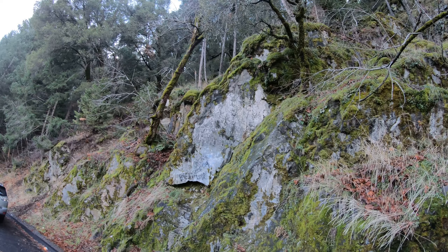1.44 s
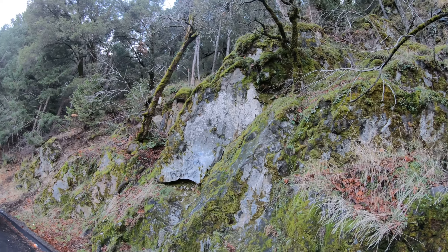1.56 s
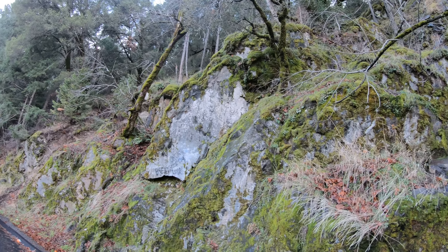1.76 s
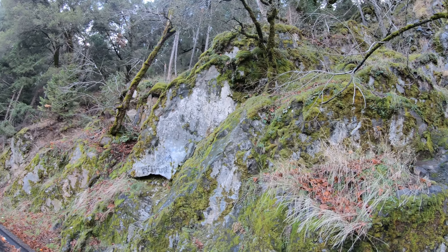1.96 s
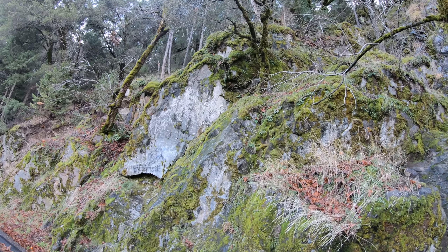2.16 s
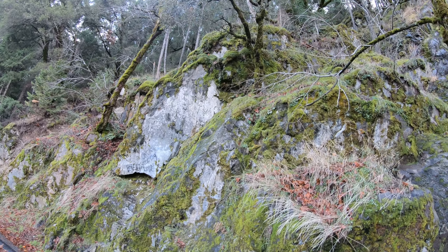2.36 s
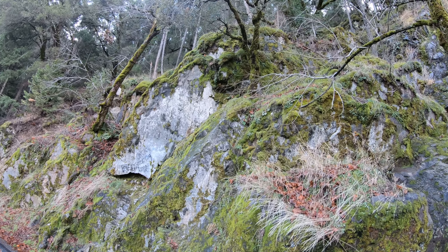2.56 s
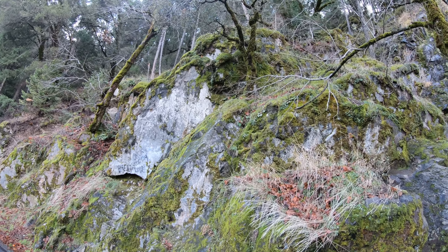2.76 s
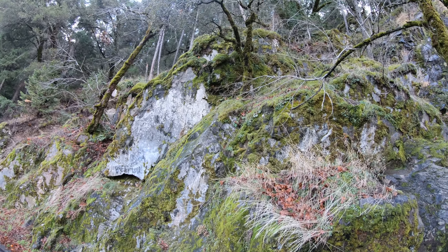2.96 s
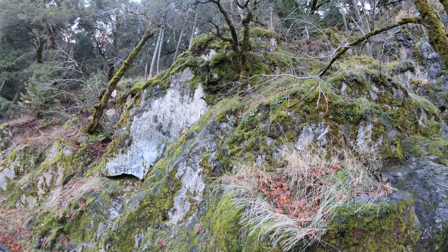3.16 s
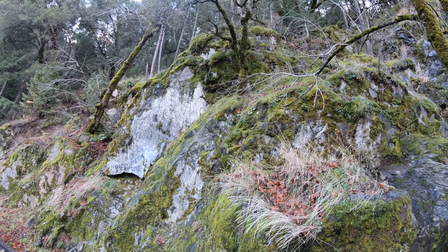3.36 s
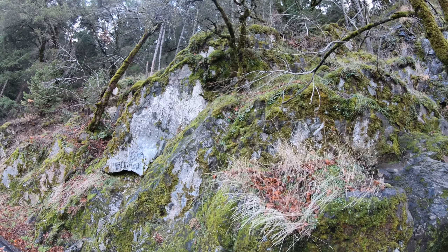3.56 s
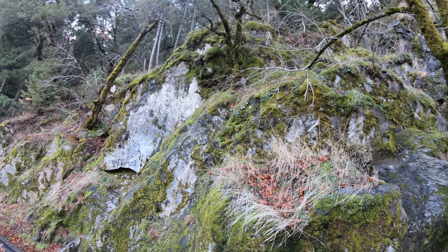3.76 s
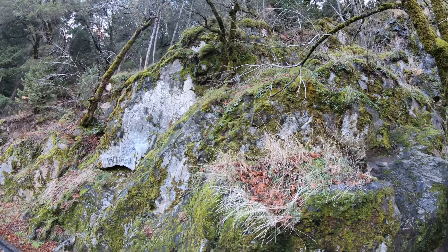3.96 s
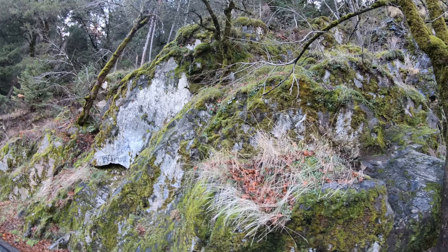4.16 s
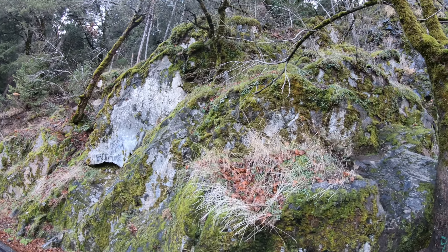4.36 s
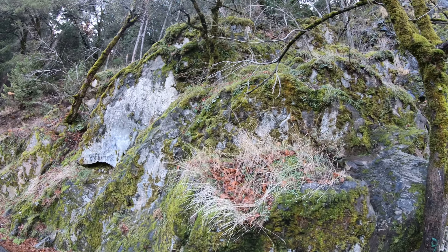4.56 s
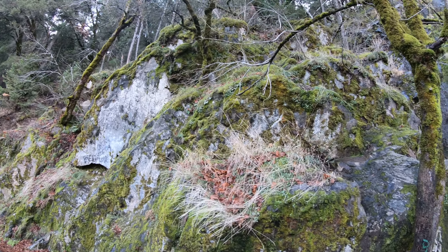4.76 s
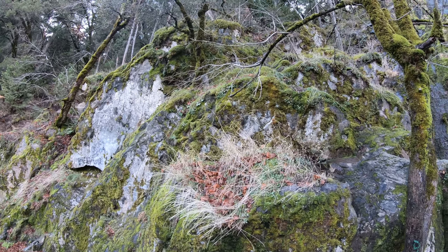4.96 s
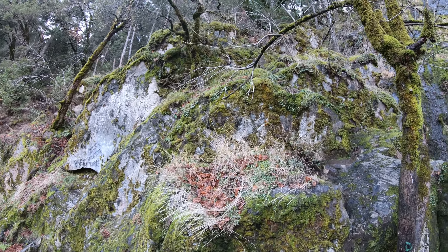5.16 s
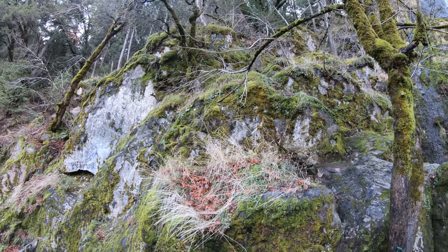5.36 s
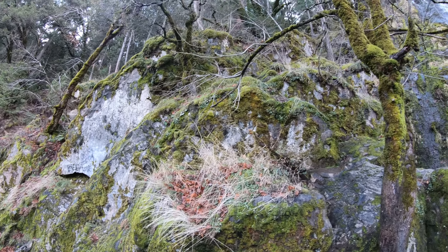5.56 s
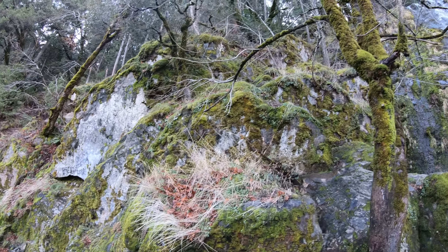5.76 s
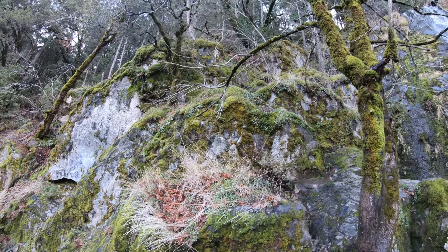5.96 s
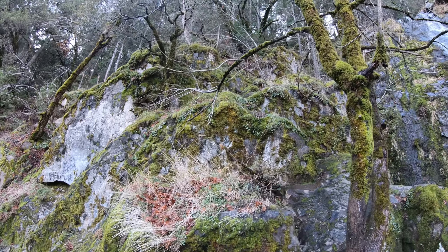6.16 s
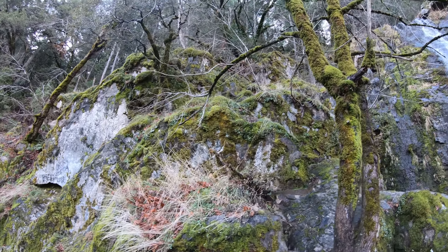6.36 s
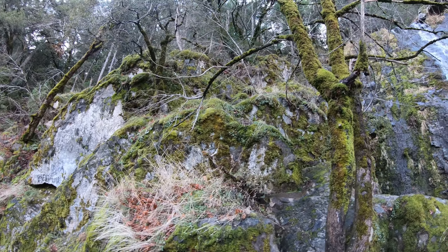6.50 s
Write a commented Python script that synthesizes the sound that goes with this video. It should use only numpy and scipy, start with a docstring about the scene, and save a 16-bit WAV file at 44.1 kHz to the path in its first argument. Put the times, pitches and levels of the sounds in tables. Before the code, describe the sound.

A waterfall rushes steadily in a forest over gusting deep rumble, while an unseen engine drones and swells twice and the sound widens late.

```python
"""In a forest, a waterfall rushes steadily down a rock face, over a gusting low rumble and a hollow band.
Water and air are shaped noise; the water's five registers follow slow level curves and moving resonances.
A four-cylinder engine drones out of sight and swells in two steps, with two fainter gliding hums beside it;
all of these are sums of sine lines that waver a little.
The microphone opens from a narrow, nearly mono beam to wide stereo, which lets in more of the spray."""
import sys
import numpy as np
from scipy import signal
from scipy.fft import irfft, next_fast_len
from scipy.io import wavfile

SR = 44100
rng = np.random.default_rng(int(sys.argv[2]) if len(sys.argv) > 2 else 0)


def wav_out(sig):
    """Save sig, one row per channel (or a flat mono array), as 16-bit PCM at SR to the path in sys.argv[1]."""
    wavfile.write(sys.argv[1], SR, np.round(np.clip(np.atleast_2d(sig).T, -1, 1) * 32767).astype(np.int16))


N = 300321

# opening of the microphone: (time [s], wide share [0-1])
OPENING = [(0, 0), (5.25, 0), (5.45, 0.07), (5.64, 0.45), (6.2, 0.94), (6.81, 0.97)]
# the engine's speed: (time [s], working cycles [per s])
SPEED = [(0, 24.0), (1.0, 23.83), (2.9, 24.21), (3.45, 24.14), (4.1, 23.5), (4.72, 23.26), (5.5, 23.15),
         (6.81, 23.3)]
# the engine's load as the level of its drone, used as a swing around its mean: (time [s], level [dB])
LOAD = [(0, -50), (0.65, -35.5), (1.5, -41), (1.85, -38), (2.08, -29), (2.4, -24.5), (3.0, -26),
        (3.88, -30.5), (4.0, -19.3), (4.45, -21), (4.72, -17.5), (5.1, -21.2), (5.45, -20.5), (5.65, -18.7),
        (6.81, -16.7)]


def from_db(db):
    """Decibels to gain."""
    return 10 ** (np.asarray(db) / 20)


def rms(x):
    """Root mean square."""
    return np.sqrt(np.mean(x ** 2) + 1e-20)


def seconds():
    """Time of every sample."""
    return np.arange(N) / SR


def in_time(rows):
    """Each column of a curve table, sample by sample."""
    s, *columns = np.transpose(rows)
    return [np.interp(seconds(), s, column) for column in columns]


def swing(curve):
    """A level curve in dB around its own mean."""
    db, = in_time(curve)
    return db - db.mean()


def ramp(start_s, length_s):
    """Rises evenly from 0 to 1."""
    return np.clip((seconds() - start_s) / length_s, 0, 1)


def bell(offset, width):
    """A smooth hump of height 1 and the given width at half height."""
    return .5 ** ((2 * offset / width) ** 2)


def bin_hz():
    """Frequency of every spectral bin of a noise a little longer than the scene."""
    return np.maximum(np.fft.rfftfreq(2 * next_fast_len(N // 2 + 1), 1 / SR), 1)


def in_frequency(rows):
    """Each column of a spectrum table, bin by bin, along a log frequency axis."""
    hz, *columns = np.transpose(rows)
    return [np.interp(np.log(bin_hz()), np.log(hz), column) for column in columns]


def white():
    """Spectrum of a fresh white noise."""
    real, imaginary = rng.standard_normal((2, len(bin_hz())))
    return real + 1j * imaginary


def waveform(spectrum):
    """From spectrum to samples."""
    return irfft(spectrum)[..., :N]


def below(hz, order=12):
    """Gain of a smooth low-pass that halves the amplitude at the given frequency."""
    return 1 / (1 + (bin_hz() / hz) ** order)


def drift(rate_hz):
    """Slow random wander with spread 1."""
    slow = waveform(white() * below(rate_hz, order=2))
    return slow / rms(slow)


def noise(colour):
    """Mono low noise of a given colour that dies away above its last point; rms 1."""
    db, = in_frequency(colour)
    x = waveform(white() * from_db(db) * below(colour[-1][0], order=4))
    return x / rms(x)


def through_ports(colour, ports):
    """Stereo spectrum of countless splashes: a part that both ports share, and a diffuse part."""
    db, = in_frequency(colour)
    likeness, balance_db, lead = in_frequency(ports)
    likeness = np.clip(likeness, 0, 1)
    sides = np.array([[1], [-1]])  # left, right
    shared = np.sqrt(1 + likeness) * white()
    diffuse = np.sqrt(1 - likeness) * white() * sides
    balance = from_db(db + sides * balance_db / 2)
    return (shared + diffuse) * balance * np.exp(-.5j * sides * lead)


def swept_peak(x, rows, width_hz, block=256):
    """A broad resonance that moves block by block and lifts or hollows its band."""
    hz, db = in_time(rows)
    r = np.exp(-np.pi * width_hz / SR)  # pole radius
    band, state = np.zeros_like(x), np.zeros((2, 2))
    for i in range(0, N, block):
        poles = [1, -2 * r * np.cos(2 * np.pi * hz[i] / SR), r * r]
        band[:, i:i + block], state = signal.lfilter([1, 0, -1], poles, x[:, i:i + block], zi=state)
    band = band * (1 - r * r) / 2  # about unit gain at the centre
    return x + (from_db(db) - 1) * band


def reshape_roar(water):
    """Four broad resonances wander through the roar and change its tone colour."""
    # each peak: (time [s], centre [Hz], lift [dB])
    bottom_path = [(0, 250, .5), (.8, 250, -1.5), (2.1, 240, 0), (2.33, 230, -8.5), (2.8, 230, -3),
                   (3.5, 260, 1), (5, 220, 2), (5.8, 220, 2.5), (6.81, 230, -1)]  # the bottom of the roar dips briefly
    body_path = [(0, 530, 2.5), (.6, 470, -2), (1.3, 450, -2), (1.7, 640, 1), (2.4, 650, 2),
                 (3.55, 620, 1.5), (4.3, 420, 1), (5.2, 490, 0), (5.9, 600, -1.5), (6.81, 560, -2.5)]  # the body fills out and thins again
    swell_path = [(0, 1000, -2.5), (.45, 1000, -2.5), (.85, 1000, -5), (1.5, 1080, -3.5), (1.9, 1300, -.5),
                  (2.35, 1490, 3), (2.9, 1550, -1.5), (3.3, 1400, -2.3), (3.9, 1100, -2), (4.4, 1120, 1),
                  (5.25, 1240, 3.7), (5.9, 950, 1.8), (6.81, 830, 4)]  # a broad swell wanders
    edge_path = [(0, 5800, 2.5), (1.5, 5750, 1.5), (3, 5700, -.5), (4.8, 5700, -2), (5.6, 5700, -2.5),
                 (6.3, 5700, -.5)]  # the upper edge of the hiss dulls
    water = swept_peak(water, bottom_path, width_hz=110)
    water = swept_peak(water, body_path, width_hz=170)
    water = swept_peak(water, swell_path, width_hz=360)
    return swept_peak(water, edge_path, width_hz=700)


def waterfall(low_hz=225, flutter_db=0.46, flutter_rate_hz=20, early_fade_s=2.25):
    """Far water merges to a smooth roar in five registers, each of which flutters a little."""
    # edges between the registers [Hz]
    edges_hz = [950, 2200, 5600, 10600]
    # plunge, rush, hiss, spray, mist: (base level [dB], share of the flow's swing, share of the hiss's swing,
    # early lift [dB], gain once wide [dB])
    register_rows = [(-34.6, 0.94, 0.13, 1, -1.0), (-38, 0.37, 0.39, 0.5, -2.6),
                     (-43.4, 0.1, 0.9, -0.5, -1.7), (-56.1, 0, 0.57, 5.6, 7.5), (-68.2, 0, .45, 1.7, 3.5)]
    # strength of the falling water, used around its mean: (time [s], level [dB])
    flow_curve = [(0, -26.5), (0.9, -32.0), (1.7, -30), (2.35, -27.5), (2.9, -29.5), (3.85, -28),
                  (4.8, -27.9), (5.25, -27.5), (5.8, -29.5), (6.81, -28.3)]
    # strength of the hiss, used around its mean: (time [s], level [dB])
    hiss_curve = [(0, -39.5), (1.1, -39.6), (1.7, -39.5), (3.0, -41), (3.95, -39.5), (4.6, -42),
                  (5.25, -41.3), (5.8, -42.5), (6.81, -39.5)]
    # the water through each microphone pattern: (frequency [Hz], relative density [dB per Hz])
    beam_colour = [(210, 3), (320, -10.8), (480, -10.3), (690, -8.5), (880, -9.3), (1050, -11.6),
                   (1350, -12.8), (1850, -15.9), (2350, -21.5), (3250, -22), (3900, -25.2), (5200, -26.2),
                   (6000, -37.5), (10300, -46), (11350, -55.5), (12500, -47.5), (15200, -64)]
    wide_colour = [(210, -4), (350, -10.5), (580, -13.3), (890, -9.6), (1080, -12), (1400, -11.3),
                   (1950, -15), (2500, -21), (3700, -25), (6500, -27), (8600, -26), (9700, -35.5),
                   (11000, -42), (12800, -46.5), (15200, -60)]
    # the two ports in each pattern: (frequency [Hz], left-right likeness [0-1], left over right [dB],
    # lead of the right port [radians])
    beam_ports = [(2000, 1, 0, 0), (5000, .997, 0, 0), (10900, .999, 0, 0), (11500, .35, 0, -.2),
                  (12300, .4, -3, -1.4), (13500, .35, -6, -1.2), (15000, .3, -2, -.9)]
    wide_ports = [(210, 0.998, 0, 0.0), (480, 0.97, 0, 0.0), (880, 0.75, 0, -0.2), (1400, 0.48, 2, -0.2),
                  (2600, 0.18, -2, 0.0), (3700, 0.45, -4, -0.3), (5200, 0.55, 0, 1.5),
                  (6400, 0.59, -2, 2.6), (8500, 0.43, -6, 2.4), (9700, 0.1, -1, 4.2),
                  (12800, 0.27, -3, 6.1), (15000, 0.18, -1, 5.7)]

    wide = np.clip(in_time(OPENING)[0], 0, 1)
    flow_db, hiss_db = swing(flow_curve), swing(hiss_curve)
    # the two patterns cross over at equal power
    patterns = [(through_ports(beam_colour, beam_ports), np.sqrt(1 - wide)),
                (through_ports(wide_colour, wide_ports), np.sqrt(wide))]
    low_passes = [below(low_hz, order=8)] + [below(hz) for hz in edges_hz] + [below(SR)]
    registers = np.diff(low_passes, axis=0)
    above_rumble = bin_hz() > 260  # each register is levelled on its mono sum above this
    early = np.exp(-seconds() / early_fade_s)
    roar = 0
    for register, (base_db, with_flow, with_hiss, early_db, wide_db) in zip(registers, register_rows):
        water = 0
        for pair, share in patterns:
            mono = waveform(pair.mean(axis=0) * register * above_rumble)
            water = water + share * waveform(pair * register) / rms(mono)
        db = base_db + with_flow * flow_db + with_hiss * hiss_db + early_db * early + wide_db * wide
        roar = roar + water * from_db(db + flutter_db * drift(flutter_rate_hz))
    return reshape_roar(roar)


def surging(bed_db, surges):
    """Gain of a bed with rounded surges on top, added in power."""
    power = from_db(bed_db) ** 2
    for crest_s, length_s, db in surges:
        power = power + from_db(db) ** 2 * bell(seconds() - crest_s, length_s)
    return np.sqrt(power)


def rumble(own_air_db=-6, air_db=-36.7, air_follows=0.44, pool_db=-41.3):
    """Gusts of deep air with the boom of the plunge pool; once wide, each port also feels air of its own."""
    # colours of the air and the pool: (frequency [Hz], relative density [dB per Hz])
    air_colour = [(10, -17), (20, -14), (30, -4.5), (42, -3), (60, -1), (85, -3), (130, -13), (250, -16)]
    pool_colour = [(40, -21), (60, -12), (85, -15), (105, 3), (135, 9), (165, 0.5), (205, -7), (280, -22),
                   (400, -48)]
    # gusts and booms: (time of the crest [s], length at half power [s], level [dB])
    gust_rows = [(.6, .2, -34), (1.018, .22, -31.5), (1.55, 0.22, -38), (2.328, 0.2, -32), (3.3, 0.6, -38),
                 (4.42, 0.14, -26.5), (5.974, 0.18, -30.5)]
    boom_rows = [(0.83, 0.2, -31), (2.85, .35, -36), (3.4, .4, -37), (4.47, 0.18, -28.5),
                 (5.85, 0.35, -35.5)]

    own_gain = in_time(OPENING)[0] * from_db(own_air_db)
    own_air = own_gain * np.array([noise(air_colour), noise(air_colour)])
    # between gusts the air follows a share of the engine load's swing
    air_gain = surging(air_db + air_follows * swing(LOAD), gust_rows)
    air = air_gain * (noise(air_colour) + own_air)
    pool = surging(pool_db, boom_rows) * noise(pool_colour)
    return air + pool


def tone(hz, db, waver_db, wander):
    """A line whose level (dB) and phase (radians) waver slowly on the way through the open air."""
    phase = 2 * np.pi * (np.cumsum(hz) / SR + rng.random()) + wander * drift(2)
    level = from_db(db + waver_db * drift(1.6))
    return np.sqrt(2) * level * np.sin(phase)  # the root makes the level an rms


def hollow(level_db=-34.5, hold_s=1.9, release_s=0.4, drop_db=12):
    """A hollow low band of the roar, with two engine lines ringing in it, that holds and then sinks."""
    # the band's colour: (frequency [Hz], relative density [dB per Hz])
    band_colour = [(95, -24), (120, -3.5), (148, 1), (170, 0.5), (195, 2), (220, 0), (242, -14), (262, -7),
                   (290, -37)]
    # the ringing lines against the band: (multiple of the cycle rate, level [dB])
    ringing_orders = [(9, -7), (11, -13)]

    cycle_hz, = in_time(SPEED)
    lines = sum(tone(k * cycle_hz, db, waver_db=1.0, wander=0.19) for k, db in ringing_orders)
    gain = from_db(level_db - drop_db * ramp(hold_s, release_s))
    return gain * (noise(band_colour) + lines)


def pulls(attack_s=0.22, release_s=0.18, sag_db_per_s=3):
    """Lift in dB as the engine pulls hard: overtones come up quickly, sag and let go."""
    # each pull: (start [s], length before release [s], lift before the sag [dB])
    pull_rows = [(2.56, 1.02, 13), (4.47, 2.25, 14)]
    lift_db = 0
    for start_s, length_s, db in pull_rows:
        sagging_db = db - sag_db_per_s * (seconds() - start_s)
        hold = ramp(start_s, attack_s) * (1 - ramp(start_s + length_s, release_s))
        lift_db = lift_db + sagging_db * hold
    return lift_db


def engine(firing_db=-31.1, waver_db=.6, wander=0.04):
    """Four firings a cycle give the drone; unequal cylinders add lines between, which make it throb."""
    # lines that follow the firing tone: (multiple of the cycle rate, level [dB])
    firing_orders = [(4, 0), (5, -10.5), (12, -23)]
    # lines from unequal cylinders: (multiple of the cycle rate, level [dB])
    uneven_orders = [(3, -10), (6, -8.5), (7, 2), (9, -12), (10, -18), (11, -22), (13, -35), (15, -18)]

    cycle_hz, = in_time(SPEED)
    load_db, pull_db = swing(LOAD), pulls()
    # octave and throb follow only a share of the load's swing, and rise with each pull
    octave_db = -45.3 + 0.34 * load_db + pull_db
    uneven_db = -42.2 + 0.36 * load_db + 0.75 * pull_db
    # the throb fades once, around 5.8 s, and returns
    uneven_db = uneven_db - 5.5 * bell(seconds() - 5.8, width=.6)
    firing = sum(tone(k * cycle_hz, firing_db + load_db + db, waver_db, wander) for k, db in firing_orders)
    octave = tone(8 * cycle_hz, octave_db, waver_db, wander)
    throb = sum(tone(k * cycle_hz, uneven_db + db, waver_db, wander) for k, db in uneven_orders)
    return firing + octave + throb


def hum(rows, waver_db=1.5, wander=0.17):
    """A low unsteady hum with its octave, which rings out as it passes 148 Hz."""
    hz, db = in_time(rows)
    ring_db = 11 * bell(2 * hz - 148, width=15)
    octave_db = db - 12.5 + ring_db
    return tone(hz, db, waver_db, wander) + tone(2 * hz, octave_db, waver_db, wander)


def upper_hum():
    """A hum whose pitch climbs, levels off and eases down at the end."""
    # (time [s], pitch [Hz], level [dB])
    glide = [(0, 56, -49), (1.3, 58.5, -45), (1.6, 60, -39.5), (2.25, 64.3, -33), (3.0, 71, -38),
             (3.5, 74, -35), (3.75, 75.5, -39), (4.1, 77, -32.5), (4.5, 77, -29.5), (5.05, 76, -27.5),
             (5.6, 75, -39), (6.81, 72.9, -56)]
    return hum(glide)


def lower_hum():
    """A late hum whose pitch falls as it swells and fades."""
    # (time [s], pitch [Hz], level [dB])
    glide = [(4.2, 63.5, -65), (4.75, 60.9, -37), (5.6, 55.3, -34), (6.2, 52.7, -30.5), (6.81, 49.5, -46)]
    return hum(glide)


def scene():
    """Stereo water and rumble with mono drones, which reach both ports alike."""
    return waterfall() + rumble() + hollow() + engine() + upper_hum() + lower_hum()


def record(dry, cutoff_hz=15300):
    """The top is cut steeply by an elliptic low-pass."""
    low_pass = signal.ellip(10, .1, 80, cutoff_hz, fs=SR, output="sos")
    return signal.sosfilt(low_pass, dry)


dry = scene()
out = record(dry)
wav_out(out)
```